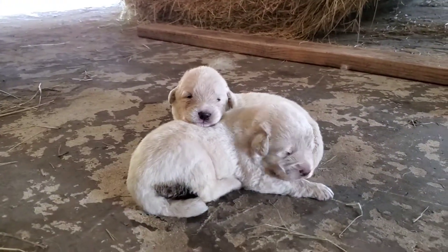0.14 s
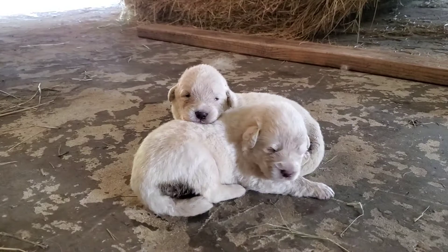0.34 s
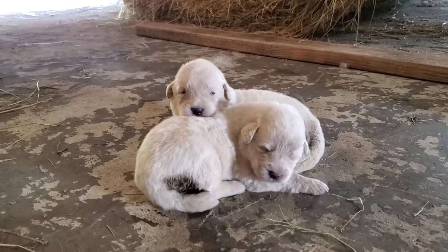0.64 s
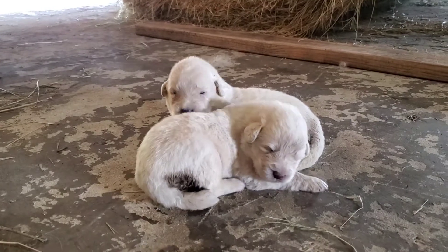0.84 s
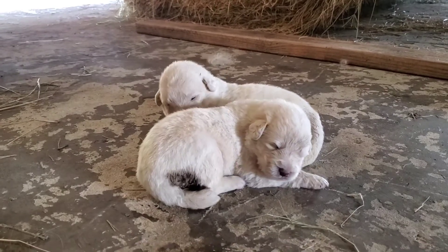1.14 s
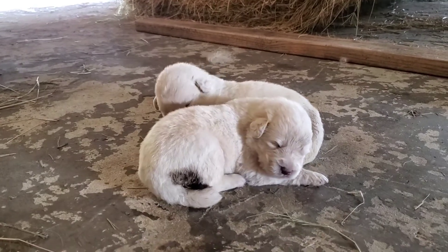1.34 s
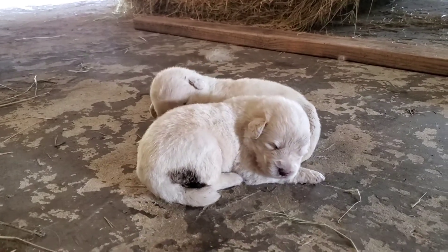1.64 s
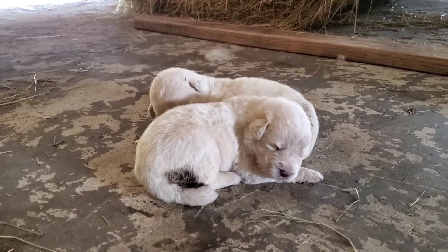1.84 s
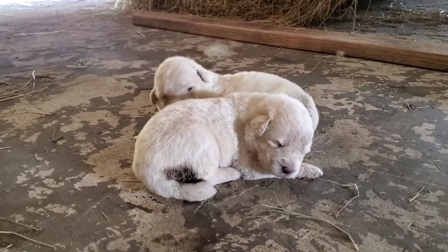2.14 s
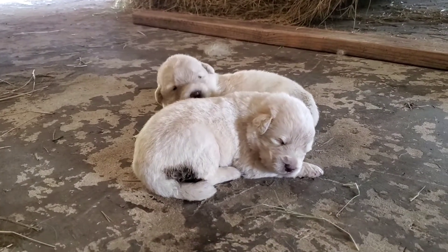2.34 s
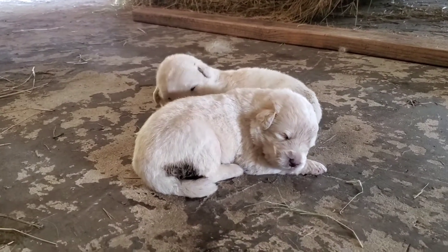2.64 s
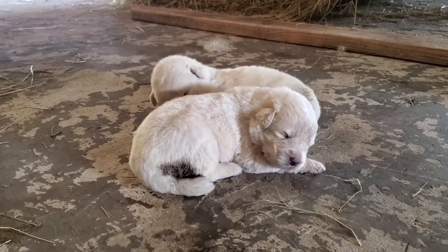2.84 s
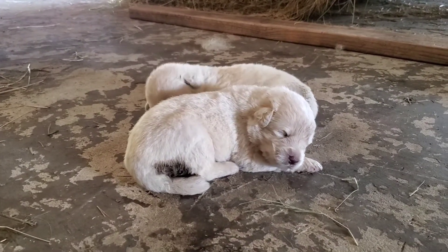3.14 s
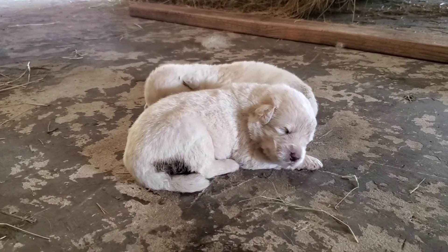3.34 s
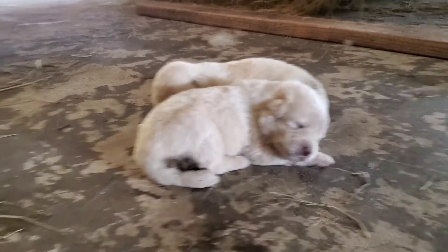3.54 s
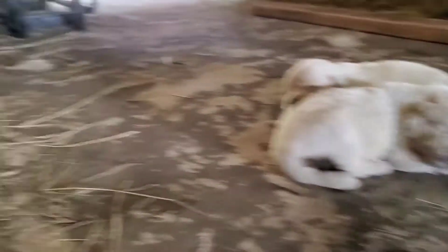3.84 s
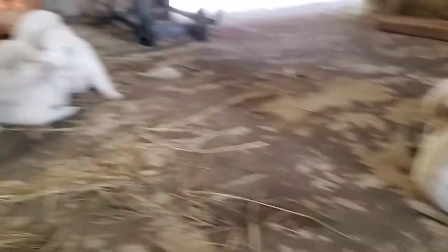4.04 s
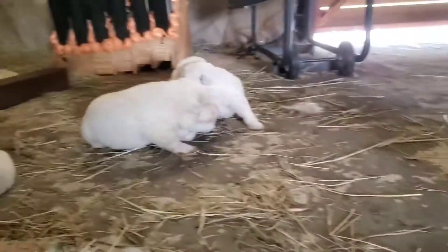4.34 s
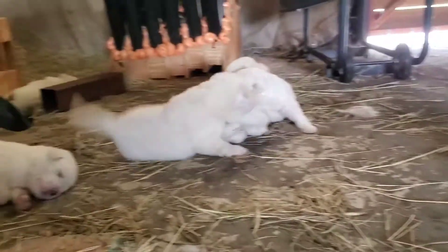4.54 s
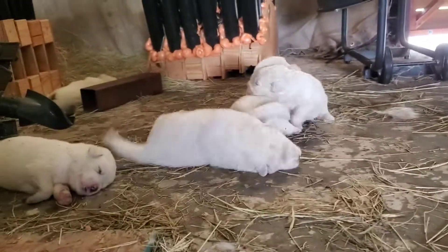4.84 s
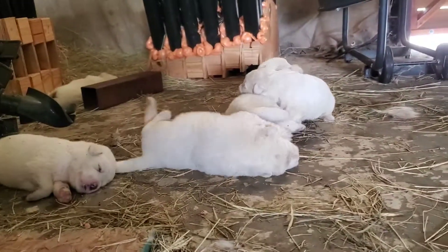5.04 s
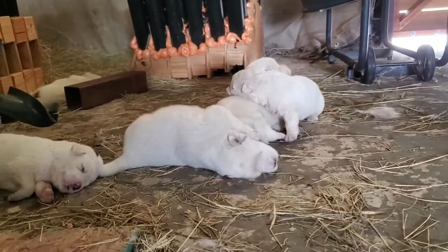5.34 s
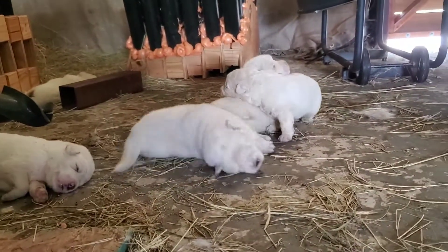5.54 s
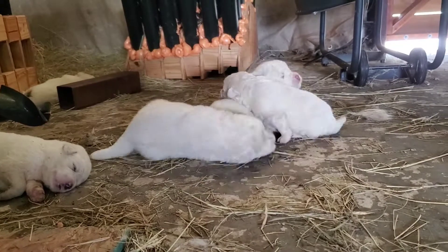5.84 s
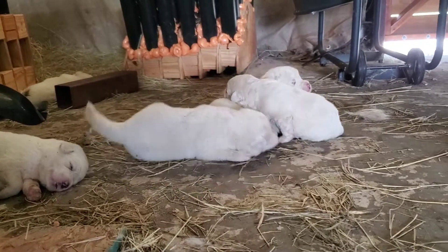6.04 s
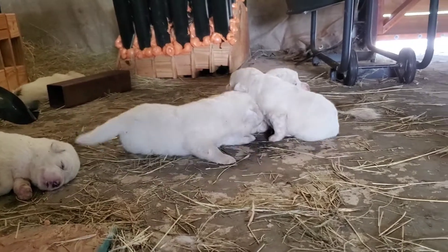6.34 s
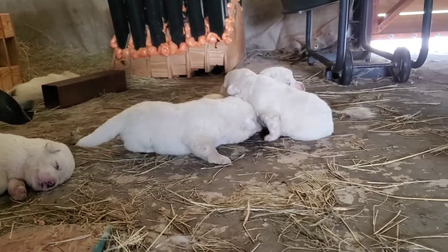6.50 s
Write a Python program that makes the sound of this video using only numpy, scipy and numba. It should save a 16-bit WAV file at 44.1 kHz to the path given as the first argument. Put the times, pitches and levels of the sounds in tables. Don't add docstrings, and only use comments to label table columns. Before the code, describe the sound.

Quiet barn air with low rumble and hiss, picked up by a handheld stereo microphone. A puppy grunts twice, then groans nasally until single clicks remain. A second puppy squeals in a breaking voice and yelps three times, with a short wooden room echo. Muffled whimpers follow at intervals, with one brighter rising squeak among them. Finger knocks, mostly on the right, bump the case throughout.

```python
import sys
import numpy as np
from scipy import signal
from scipy.fft import rfft, irfft, next_fast_len
from scipy.io import wavfile
from scipy.ndimage import uniform_filter1d, map_coordinates
from numba import njit

SR = 44100
rng = np.random.default_rng(int(sys.argv[2]) if len(sys.argv) > 2 else 0)


def store_pcm(level_fs):
    pcm = np.round(np.clip(level_fs, -1, 1) * 32767).astype(np.int16)
    wavfile.write(sys.argv[1], SR, np.atleast_2d(pcm).T)


def how_loud(loudness_db):
    steps = np.asarray(loudness_db, float) / 20
    return 10 ** steps


N = 294147
T = np.arange(N) / SR

# (frequency [Hz], density [dB per Hz])
BARN = [(18, -39), (30, -13), (81, -1.5), (147, -17.5), (304, -21), (448, -35.5), (815, -24.5),
        (953, -46.5), (1170, -27.5), (2310, -31), (3410, -36.5), (11300, -33.5), (15000, -32.5)]
# (time [s], level over calm [dB])
AIR = [(0.0, 1), (0.39, -4.5), (0.65, 3.5), (0.7, 14), (0.86, -3.5), (0.98, 0), (1.1, 9.5), (1.3, 13.5),
       (1.47, 8.5), (1.6, -1.5), (2.5, -1), (3.3, 1), (3.6, -7.5), (4.14, 1), (4.3, -6), (4.9, 1),
       (5.9, 1.5), (6.67, -1)]
STIR_SHARES = (.75, 0.99, 0.82)
# (start of opening [dB], range to fully open [dB], hiss let through [dB], smoothing time of
# the lingering after loud squeals [s], never under 0.02)
GATE = (-54.5, 23.5, 10, -0.3)
# (start [dB], depth [dB])
DUCK = (-33, -18)
# (middle [dB], top [dB])
LINGER = (11, 4)
# (time [s], pitch [Hz], level [dB])
CHIRPS = [
    [(4.625, 3480, -69), (4.637, 3750, -65), (4.665, 3110, -63)],
    [(4.8, 3120, -74), (4.83, 3490, -70), (4.855, 3300, -72)],
]

# (time [s], peak [dB], left minus right [dB], ring [Hz], tick [dB])
TAPS = [(0.652, -49, -14.5, 430, 9), (0.681, -35.5, -20, 450, -4.5), (0.802, -54, 13, 538, -27),
        (0.837, -58, 9, 448, -6), (1.112, -38, -11, 590, -32), (1.461, -32, -34, 930, -53),
        (1.551, -43.5, -15, 730, -6.5), (1.604, -36, -26, 1060, -26.5), (1.903, -36.5, -17.5, 701, -3.5),
        (1.915, -52.5, -27, 1500, -1), (2.096, -46, 3, 367, -6.5), (2.75, -10.5, -23.5, 714, -15),
        (3.353, -20.5, -17, 815, -13.5), (3.85, -54, -11, 361, -33), (3.987, -24, 17, 418, -67),
        (4.106, -49, 10, 869, -24), (4.118, -56, 28, 397, -26), (4.619, -58, 8, 455, -5),
        (4.948, -49.5, 8, 710, 1), (5.323, -68, -1, 777, -12.5), (5.841, -60.5, 16, 530, 8),
        (6.107, -56, 19, 1180, -7)]
# (time [s], peak [dB], left minus right [dB])
CASE_THUMPS = [(.375, -48, -3), (.684, -42, -10), (.88, -52, -8), (1.08, -49, 12), (1.464, -44, -20),
               (2.751, -42, -26)]
# (start [s], length [s], peak [dB], left minus right [dB], tilt [dB per octave])
RUBS = [
    (0.674, 0.059, -59, -13.5, -3.5),
    (.7, 0.12, -63.5, -6, -1),
    (1.597, .11, -53, -15.5, 0.8),
    (3.988, 0.12, -60, 18.5, -1.4),
]
# (frequency [Hz], density [dB per Hz])
RUB_COLOUR = [(88, -41), (150, -12.5), (451, -5.5), (797, -9), (928, -7.5), (3010, -15), (3850, -12),
              (14000, -51)]
THUMP_DB, THUMP_SQUASH = -45.5, 0.77

# (share of its length, level under the peak [dB])
PUSH = [(0, -12.5), (.2, -2), (.5, 0.75), (.75, -7), (1, -9)]
ARCH = 0.0065

# (start [s], length [s], pulse rate [Hz], glide [share], peak [dB])
GRUNTS = [
    (0.01, 0.093, 244.8, .02, -51.5),
    (0.473, 0.082, 197, .27, -50),
]
# (time [s], pulse rate [Hz], level [dB])
GROAN = [(0.905, 217.6, -87), (0.933, 214.8, -55.5), (1.265, 222, -51), (1.52, 200.7, -53),
         (1.73, 159.8, -53), (1.78, 123, -62), (1.821, 84.9, -58), (1.87, 78.5, -58.5), (1.926, 58.9, -61)]
# (time [s], drop of the rate [share])
SLACKS = [(1.008, 0.16), (1.075, 0.059), (1.17, 0.076), (1.356, 0.12), (1.47, .12), (1.58, 0.056),
          (1.673, 0.13)]
# (time [s], peak [dB])
CREAKS = [(1.936, -47.5), (1.958, -47), (1.973, -49), (1.993, -48), (2.014, -49), (2.036, -45.5),
          (2.145, -47.5), (2.221, -55.5), (2.387, -45), (2.426, -43.5), (2.459, -43.5)]
# (frequency [Hz], width [Hz], level [dB])
GROAN_THROAT = [(395, 850, -4), (800, 464, 8), (1805, 430, -2.5), (6075, 650, -27), (8536, 900, -34.5),
                (10570, 1100, -22.5)]
SLACK_S, SLACK_DB = .055, -3
GRUNT_SOFT_S = 0.00038

# (start [s], length [s], pitch [Hz], glide [share], peak [dB])
HUMS = [
    (1.82, 0.036, 316.5, 0.046, -42.5),
    (2.056, 0.038, 311.3, -0.0075, -41.5),
]
HUM_DULL_DB = -26

# (start [s], length [s], pitch [Hz], glide [share], peak [dB])
WHIMPERS = [(3.471, 0.072, 427, -0.02, -33.5), (3.713, 0.043, 356.6, 0.11, -42),
            (3.939, 0.035, 325, -0.17, -44.5), (4.168, 0.057, 364, 0.099, -38),
            (4.43, 0.038, 222, 0.17, -52), (4.699, .03, 289, 0.01, -59),
            (4.896, 0.043, 239.7, -0.32, -43.5), (5.032, .035, 375, -0.066, -71),
            (5.41, .055, 325.5, 0.34, -34.5), (5.678, .055, 299.3, -0.256, -38),
            (5.935, 0.021, 280.3, 0.065, -56.5), (6.148, 0.043, 216, 0.22, -51.5)]
# (roughness near -35 dB [0-1], more per dB of effort [1/dB])
WHIMPER_ROUGH = (.24, .016)
# (time [s], pitch [Hz], level [dB], roughness [0-1])
SQUEAKS = [
    [(2.278, 699, -45, 0.28), (2.286, 746.6, -29.5, 0.12), (2.317, 874, -26, 0.13),
     (2.32, 529, -29.5, 0.48), (2.365, 456, -54, 0.8)],
    [(5.106, 321, -54.5, 0), (5.132, 365.5, -37, 0.09), (5.158, 435.3, -26.5, 0.28),
     (5.164, 506, -24.5, 0.34), (5.18, 536.4, -32, 0.29), (5.204, 485, -45, 0.14)],
]
# (time [s], pitch [Hz], level [dB], roughness [0-1])
SQUEALS = [
    [(2.506, 806, -43, 0.1), (2.516, 755, -28.5, 0.01), (2.532, 864, -25.5, 0), (2.558, 1343, -24, 0.05),
     (2.575, 1360, -19.5, 0), (2.58, 1246, -13, 0.09), (2.6, 1232, -15.5, 0.04), (2.622, 949, -27.5, 0.2),
     (2.636, 846, -42, 0.3)],
    [(2.791, 755, -33.5, 0), (2.801, 648.9, -32, 0.04), (2.814, 713, -23.5, 0.08),
     (2.828, 1142, -32.5, 0.32), (2.848, 1303, -18, 0.34), (2.863, 1316, -16, 0.55),
     (2.868, 763, -19, 0.52), (2.897, 822, -20.5, 0.52), (2.925, 758, -32.5, 0.34)],
    [(3.101, 699.4, -40, 0.3), (3.124, 702, -23.5, 0.04), (3.146, 1186, -23.5, 0.21),
     (3.165, 1389, -11, 0.07), (3.178, 1318, -14, 0.22), (3.19, 1272, -11, 0.04), (3.23, 1135, -18.5, 0.01),
     (3.244, 932, -21.5, 0.19), (3.26, 710, -32.5, 0.25)],
]
# (frequency [Hz], level [dB])
SHUT = [(150, -28), (250, -14.5), (764, -8), (1460, -14), (1890, -12.5), (3280, -39), (3800, -46),
        (7150, -33), (9570, -31), (12000, -38.5), (15600, -64.5), (22000, -120)]
# (frequency [Hz], level [dB])
OPEN = [(300, -47), (600, -34.5), (800, -18.5), (1350, -8.5), (1800, -2), (2400, -5.5), (3000, -20),
        (3700, 2.5), (5000, -5), (5600, -17.5), (7400, -13), (10000, -32.5), (14000, -37)]
# (shut below [Hz], range [Hz], sag [share])
MOUTH = (900, 450, 0.98)
MOUTH_LAG_S = .016
# (frequency [Hz], density [dB per Hz])
BREATH = [(150, -33), (250, -2.5), (687, -4.5), (813, 1.5), (1280, -8.5), (1950, -5.5), (4610, -13),
          (14000, -15)]

# (time [s], lag of the right port [ms])
TURN = [(3.6, 0.44), (3.75, 0.38), (3.96, 0.28), (4.19, 0.25), (4.45, 0.11)]
ROOM_T60_S, ROOM_DAMP, ROOM_DB = .34, .1, -11.5


def unit(x):
    return x / np.sqrt(np.mean(x ** 2) + 1e-18)


def colour_db(table, hz):
    f, db = np.transpose(table)
    return np.interp(np.log(hz + 1), np.log(f), db)


def tint(x, table):
    size = next_fast_len(len(x))
    hz = np.arange(size // 2 + 1) * SR / size
    return irfft(rfft(x, size) * how_loud(colour_db(table, hz)), size)[:len(x)]


def band(x, hz, width):
    return signal.lfilter(*signal.iirpeak(hz, hz / width, SR), x)


def ease(x, seconds):
    keep = np.exp(-1 / (seconds * SR))
    return signal.lfilter([1 - keep], [1, -keep], x)


def walk(n, rate):
    k = max(int(SR / rate), 1)
    smooth = uniform_filter1d(uniform_filter1d(rng.standard_normal(n + 2 * k), k), k)
    return unit(smooth[k:-k])


def span(rows, fade=0.0023):
    s, *cols = np.transpose(rows)
    i = np.arange(int(s[0] * SR), int(s[-1] * SR))
    gate = np.clip(np.minimum(i / SR - s[0], (s[-1] - i / SR) / 3) / fade, 0, 1)
    return i, [np.interp(i / SR, s, c) for c in cols], gate


def push(start, length, hz, glide, db):
    share, under = np.transpose(PUSH)
    pitch = hz * (1.03 + glide * (share - .5) + ARCH * under)
    return np.transpose([start + share * length, pitch, db + under])


def ports(x, pan_db):
    return np.array([x * how_loud(pan_db / 2), x * how_loud(-pan_db / 2)])


@njit
def walls(x, lags, gain, damp):
    line, soft, out = np.zeros((8, 4096)), np.zeros(8), np.zeros((2, len(x)))
    for i in range(len(x)):
        total = 0.
        for k in range(8):
            soft[k] += (1 - damp) * (gain[k] * line[k, (i - lags[k]) & 4095] - soft[k])
            total += soft[k]
            out[k % 2, i] += soft[k]
        for k in range(8):
            line[k, i & 4095] = x[i] + soft[k] - total / 4
    return out


def noise_reduction(voices):
    start_db, range_db, _, closing_s = GATE
    db = 10 * np.log10(uniform_filter1d(voices ** 2, 400) + 1e-12)
    opened = np.clip((db - start_db) / range_db, 0, 1)
    ducked = np.clip((db - DUCK[0]) / 6, 0, 1)
    ringing = np.minimum(6.6 * ease(ducked, max(closing_s, .02)), 1)
    return opened, ducked, ringing


def barn(opened, ducked, ringing):
    stir = np.interp(T, *np.transpose(AIR))
    low, mid, top = (share * stir for share in STIR_SHARES)
    mid = mid + LINGER[0] * ringing
    top = top + LINGER[1] * ringing
    out = 0
    for hz in 32 * 2 ** np.arange(0, 8.95, .4):
        low_share = np.interp(np.log(hz), np.log([160, 500]), [1, 0])
        top_share = np.interp(np.log(hz), np.log([4000, 8000]), [0, 1])
        swell = low_share * low + top_share * top + (1 - low_share - top_share) * mid
        swell = swell + (0.39 * (1 - low_share) + 0.48 * top_share) * GATE[2] * opened
        swell = swell + DUCK[1] * ducked * (hz < 900) * min(hz / 170, 1)
        flicker = (2.8 + 1.2 * low_share) * walk(N, 14)
        db = colour_db(BARN, hz) + 10 * np.log10(hz) + swell + flicker
        noises = [rng.standard_normal(N) for _ in range(3)]
        both, left, right = (unit(band(band(x, hz, hz / 3), hz, hz / 3)) for x in noises)
        lean_db = np.array([[-1.5], [1.5]]) * low_share
        out = out + how_loud(db - 82.5 + lean_db) * (.5 * both + np.array([left, right]))
    return out


def bird():
    out = np.zeros(N)
    for rows in CHIRPS:
        i, (hz, db), gate = span(rows)
        size = how_loud(db - 7 + 4 * walk(len(i), 200))
        phase = 2 * np.pi * np.cumsum(hz * (1 + 0.027 * walk(len(i), 315))) / SR
        out[i] += gate * size * np.sin(phase)
    return out


def fingers():
    out, t = np.zeros((2, N)), T[:3000]
    thump = -np.sin(2 * np.pi * 75 * t) * t / 0.0058 * np.exp(1 - t / 0.0064)
    for s, db, pan_db, hz, tick_db in TAPS:
        burst = rng.standard_normal(len(t)) * np.exp(-t / 0.00096)
        tick = how_loud(tick_db - 1.5) * band(burst, 2700, 9800) * 2
        swell = np.exp(-t * hz / 0.83) * (1 - np.exp(-t * hz / .04))
        ring = np.roll(np.sin(2 * np.pi * hz * t + 0.75) * swell, 24) * 1.055
        tap = tick + ring + how_loud(THUMP_DB - THUMP_SQUASH * db) * thump
        i = int((s + .0012) * SR)
        out[:, i:i + len(t)] += ports(how_loud(db) * tap, pan_db)
    for s, db, pan_db in CASE_THUMPS:
        i = int(s * SR)
        out[:, i:i + len(t)] += ports(how_loud(db) * thump, pan_db)
    for s, length, db, pan_db, tilt_db in RUBS:
        i = np.arange(int(s * SR), int((s + length) * SR))
        grit = rng.standard_normal((2, len(i))) * how_loud(2.5 * walk(len(i), 340))
        tilt = [(125, 0), (16000, 7 * tilt_db)]
        rub = np.array([unit(tint(tint(g, RUB_COLOUR), tilt)) for g in grit])
        stroke = abs(np.sin(np.pi * (i / SR - s) / length)) ** 1.08
        out[:, i] += how_loud(db + 7) * rub * ports(stroke, pan_db)
    return out


def groaner():
    slips = np.zeros(N)
    for rows in [push(*grunt) for grunt in GRUNTS] + [GROAN]:
        i, (hz, db), gate = span(rows, fade=0.004)
        slack = sum(drop * np.clip(1 - abs(i / SR - s) / SLACK_S, 0, 1) for s, drop in SLACKS)
        hz, db = hz * (1 - slack), db + SLACK_DB * slack
        wobble = .022 if rows is GROAN else .08
        turns = np.cumsum(hz * (1 + wobble * walk(len(i), 120))) / SR
        at = np.flatnonzero(np.diff(np.floor(turns)))
        size = (gate * how_loud(db + 35.5 + 2.1 * walk(len(i), 390)) / np.sqrt(hz / 200))[at]
        late = (turns[at + 1] % 1) * SR / hz[at]
        slips[i[at]] += size * np.clip(late, 0, 1)
        slips[i[at] + 1] += size * np.clip(1 - late, 0, 1)
        if rows is not GROAN:
            slips[i] = uniform_filter1d(slips[i], int(GRUNT_SOFT_S * SR))
    for s, db in CREAKS:
        slips[int(s * SR)] += how_loud(db + 26.5)
    puffs = signal.lfilter([1], [1, -.985], slips) * rng.standard_normal(N)
    out = 0
    for k, (hz, width, db) in enumerate(GROAN_THROAT):
        source = slips + puffs * how_loud(-8 if hz > 5000 else -36)
        out = out + (-1) ** k * how_loud(db) * band(band(source, hz, width), hz, width)
    return out


def call(hz, db, rough, mouth):
    rough, mouth, n = np.clip(rough, 0, 1), np.clip(mouth, 0, 1), len(hz)
    phase = 2 * np.pi * np.cumsum(hz * (1 + 0.18 * rough * walk(n, 570))) / SR
    k = np.arange(1, 40)[:, None]
    throat_db = (1.5 - mouth) * colour_db(SHUT, k * hz) + mouth * colour_db(OPEN, k * hz)
    gain = how_loud(throat_db) * (k * hz < 15000)
    gain = gain * how_loud(0.4 * np.minimum(db + 31.5, 0) * np.log2(k))
    flutter = uniform_filter1d(rng.standard_normal(gain.shape), 150) * np.sqrt(150)
    gain = gain * how_loud((.2 + 1.4 * rough) * np.clip(k - 2, 0, 6) * flutter)
    tone = -(gain * np.sin(k * phase + .12 * k ** 2)).sum(0) / np.sqrt((gain ** 2).sum(0) / 2)
    above = signal.butter(4, .75 * hz.min(), "high", fs=SR, output="sos")
    noise = signal.sosfilt(above, rng.standard_normal(n))
    air = (1 - mouth) * unit(tint(noise, SHUT)) + mouth * unit(tint(noise, OPEN))
    air = air * (1 + 0.64 * np.cos(phase))
    tone = tone * (1 + 1.6 * rough * walk(n, 450)) * np.sqrt(1 - .4 * rough)
    return signal.sosfilt(above, tone + (.012 + 0.9 * rough) * air)


def hums():
    out = np.zeros(N)
    for hum in HUMS:
        i, (hz, db), gate = span(push(*hum))
        out[i] += gate * how_loud(db) * call(hz, db + HUM_DULL_DB, 0 * hz, 0 * hz)
    return out


def caller():
    out, t = np.zeros(N), T[:4000]
    shut_hz, range_hz, sag = MOUTH
    for rows in SQUEALS + SQUEAKS + [push(*whimper) for whimper in WHIMPERS]:
        i, (hz, db, *rough), gate = span(rows)
        if rough:
            rough = rough[0]
        else:
            rough = WHIMPER_ROUGH[0] + WHIMPER_ROUGH[1] * (db.max() + 35.5) + 0 * hz
        top = np.maximum.accumulate(hz)
        mouth = np.clip((top - shut_hz) / range_hz, .03, 1) * (1 - sag * (1 - hz / top))
        out[i] += gate * how_loud(db) * call(hz, db, rough, ease(mouth, MOUTH_LAG_S))
        puff = unit(tint(rng.standard_normal(len(t)), BREATH)) * np.exp(-((t - .04) / .027) ** 2)
        puff_db = -51.0 + 0.52 * (min(db.max(), -26) + 28.0)
        start = i[-1] - int(.025 * SR)
        out[start:start + len(t)] += how_loud(puff_db) * puff
    return out


def scene():
    far, near = caller() + hums(), groaner()
    lag = np.interp(T, *np.transpose(TURN)) * SR / 1000
    right = map_coordinates(far, [np.arange(N) - lag], order=3)
    direct = np.array([far, right]) + near
    floor = np.diff([np.roll(far, 61), np.roll(right, 83)], prepend=0)
    lags = np.array([211, 347, 521, 739, 947, 1213, 1523, 1877])
    feed = signal.lfilter([1, -.85], [1], far + how_loud(6) * near)
    echo = walls(feed + 1e-18, lags, how_loud(-60 * lags / SR / ROOM_T60_S), ROOM_DAMP)
    background = bird() + barn(*noise_reduction(far + near))
    return direct + how_loud(-5.5) * floor + how_loud(ROOM_DB) * echo + fingers() + background


def roll_off(x):
    return signal.sosfilt(signal.butter(12, 15680, fs=SR, output="sos"), x)


def record(dry):
    rounded = np.sign(dry) * (.6 + .35 * np.tanh((abs(dry) - .6) / .35))
    soft = np.where(abs(dry) < .6, dry, rounded)
    mix = signal.sosfilt(signal.ellip(8, .2, 60, 14520, fs=SR, output="sos"), soft)
    return roll_off(mix)


dry = scene()
out = record(dry)
store_pcm(out)
```